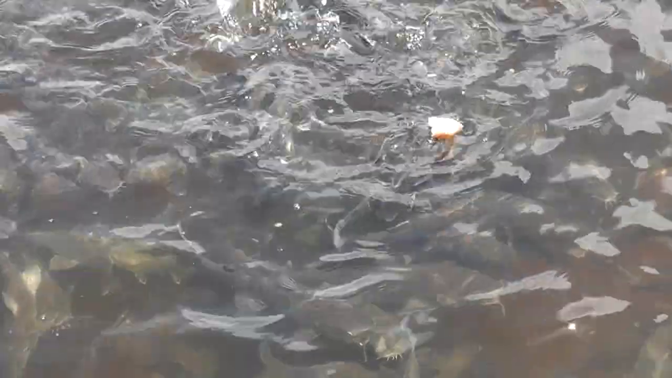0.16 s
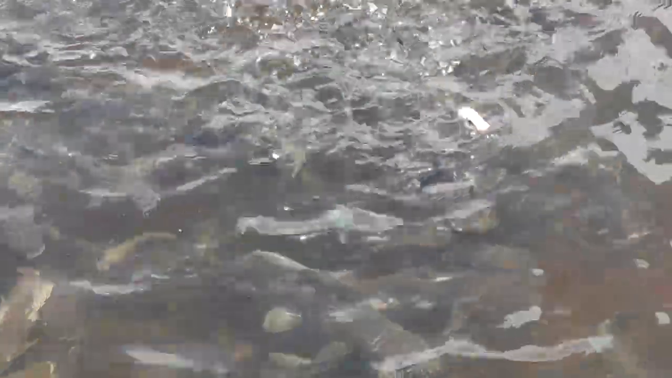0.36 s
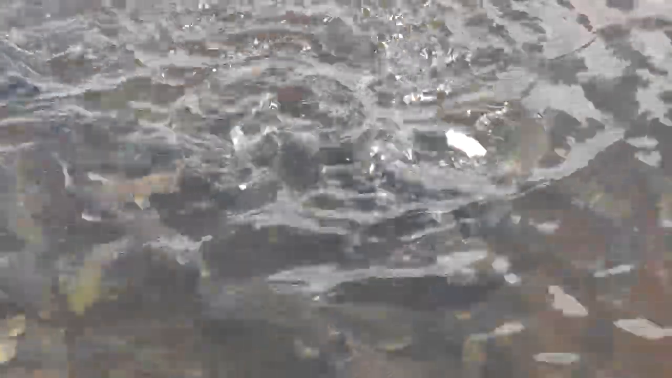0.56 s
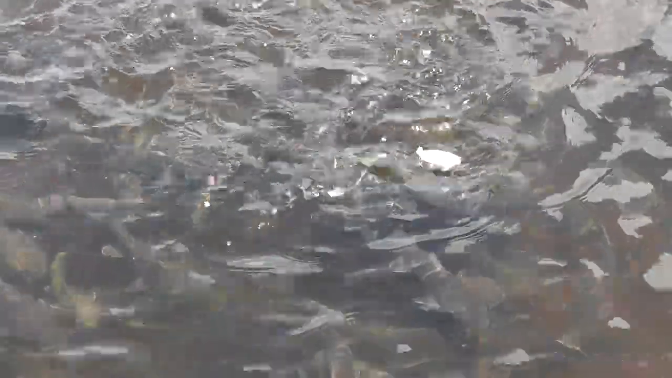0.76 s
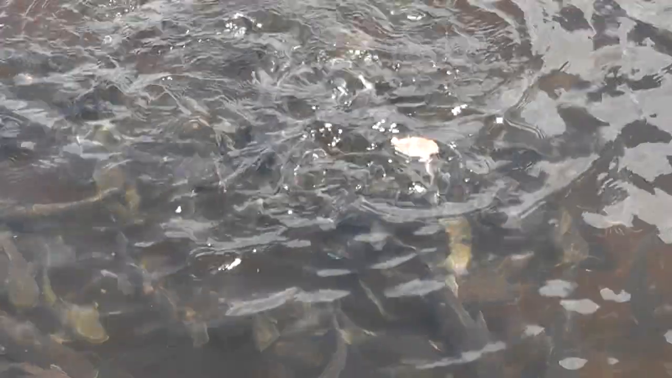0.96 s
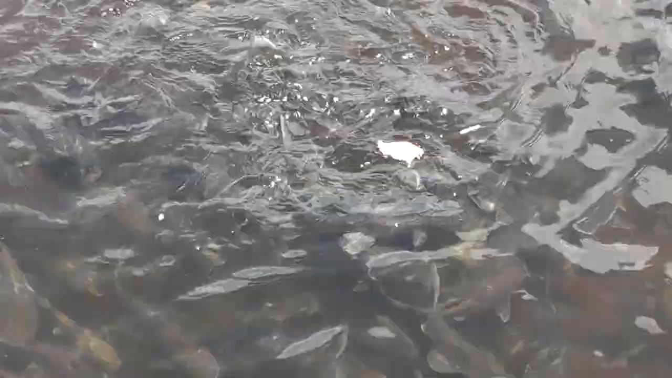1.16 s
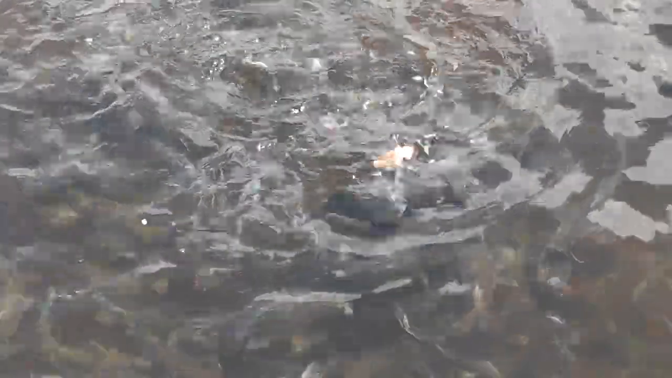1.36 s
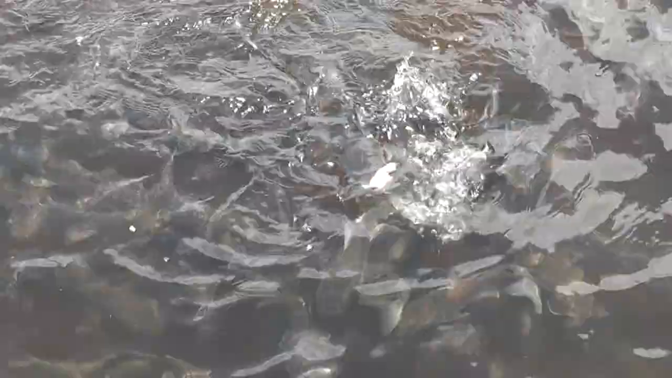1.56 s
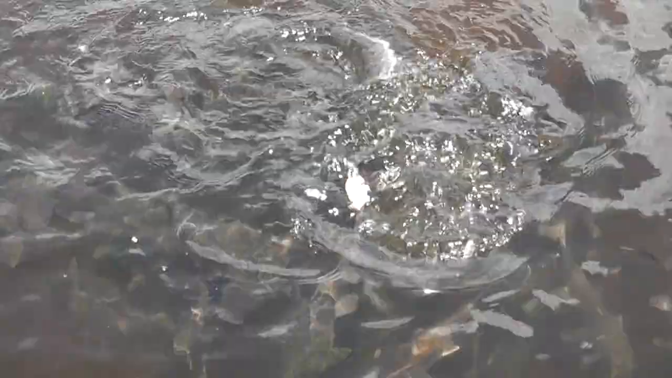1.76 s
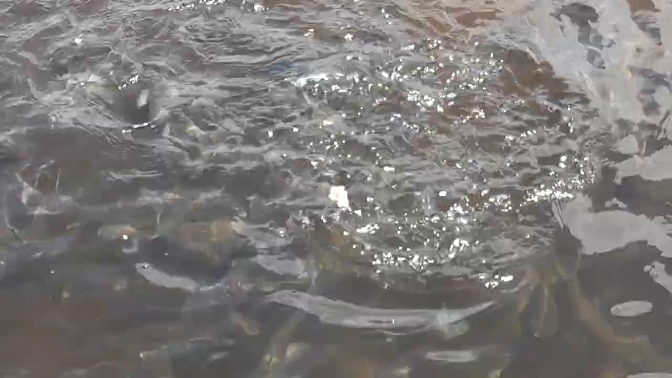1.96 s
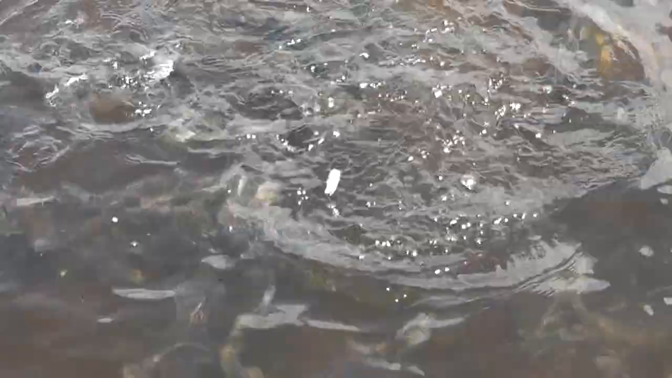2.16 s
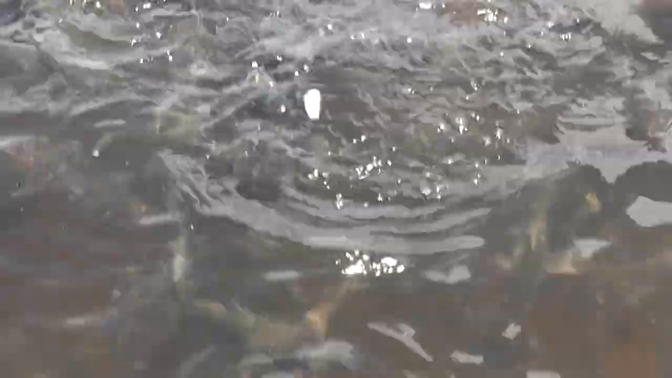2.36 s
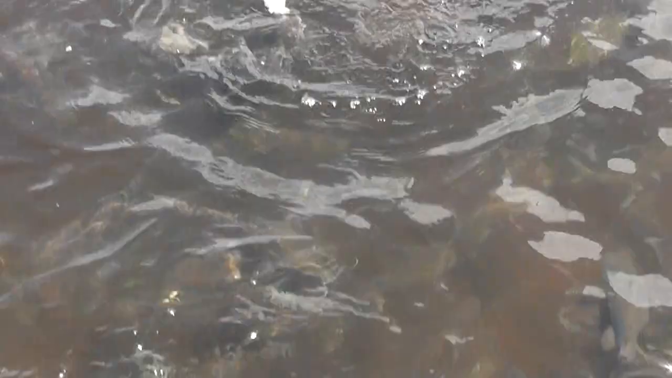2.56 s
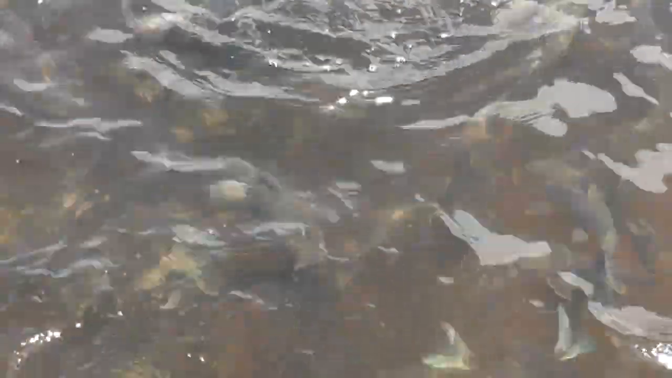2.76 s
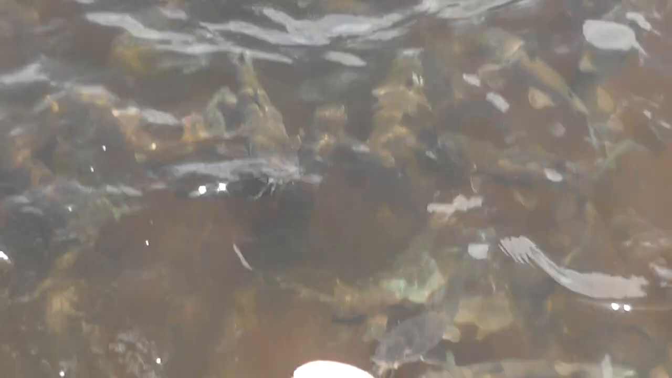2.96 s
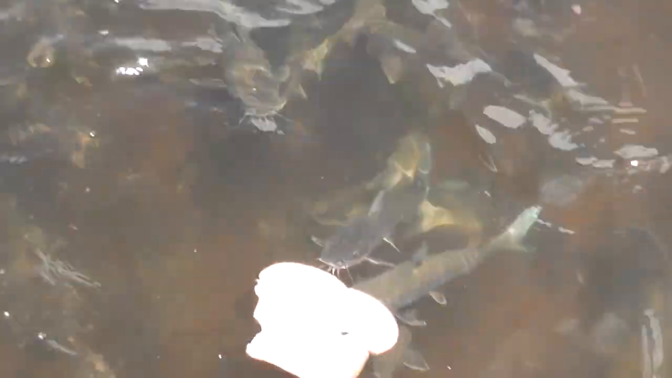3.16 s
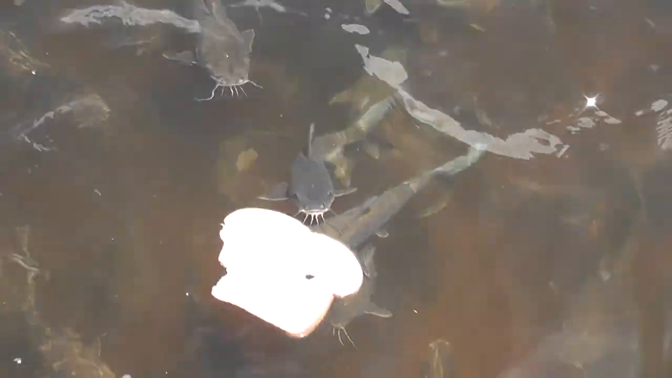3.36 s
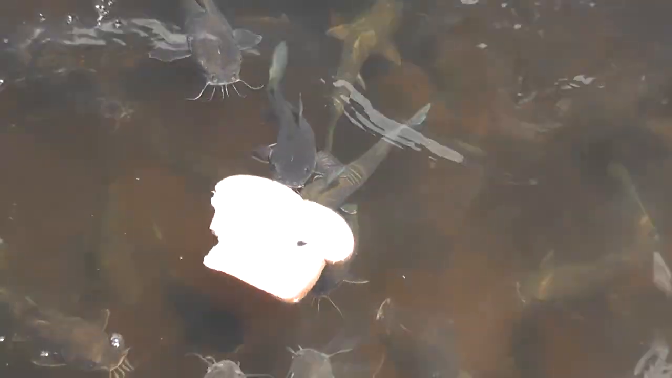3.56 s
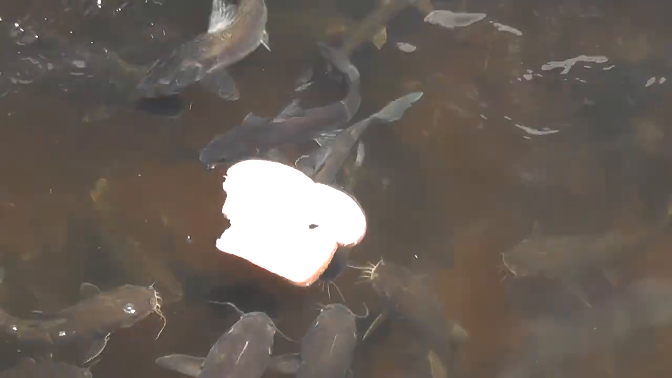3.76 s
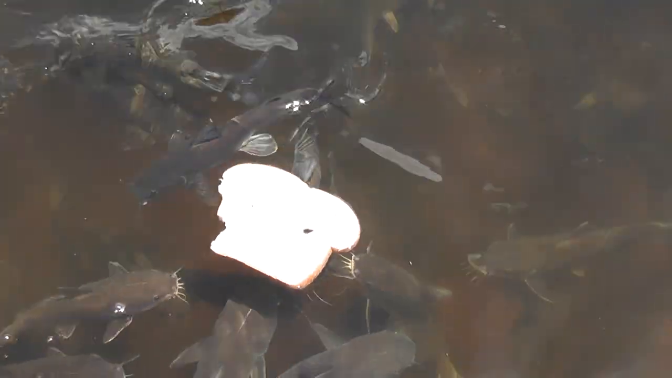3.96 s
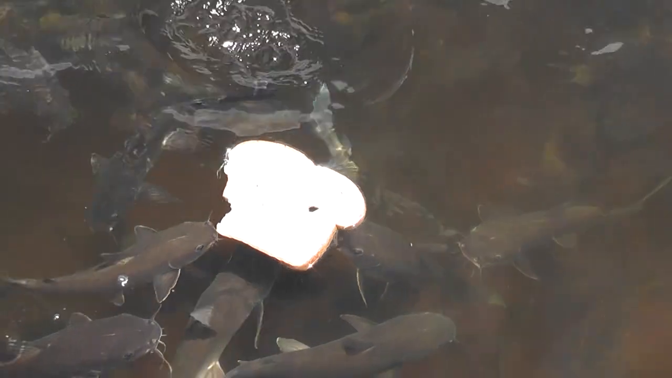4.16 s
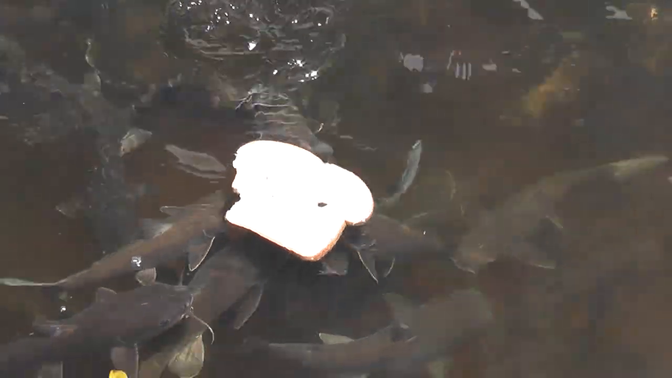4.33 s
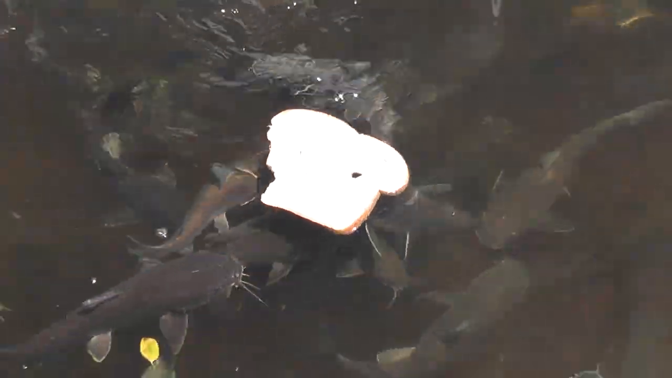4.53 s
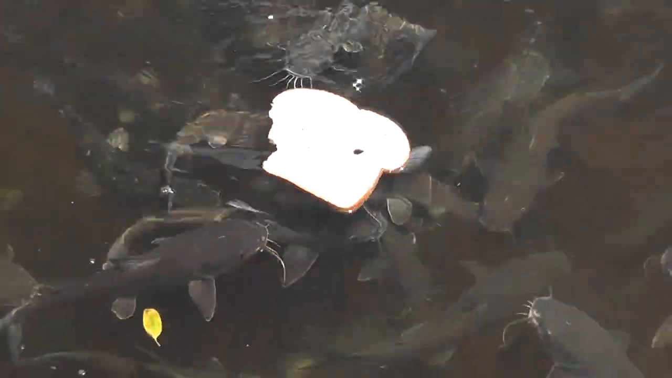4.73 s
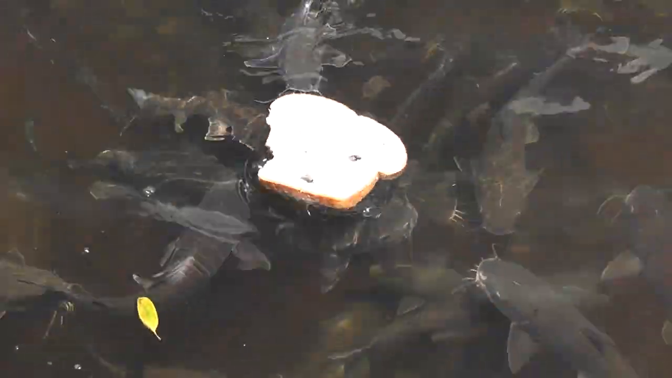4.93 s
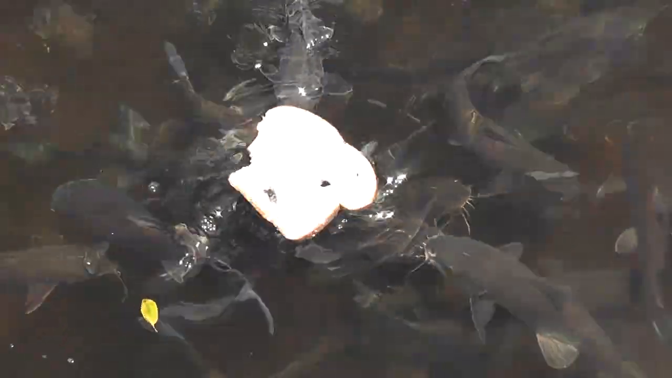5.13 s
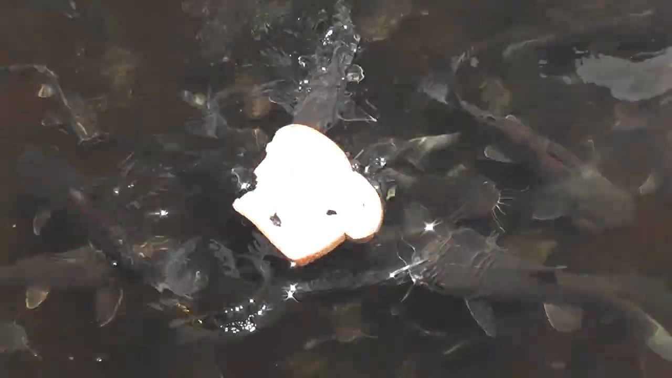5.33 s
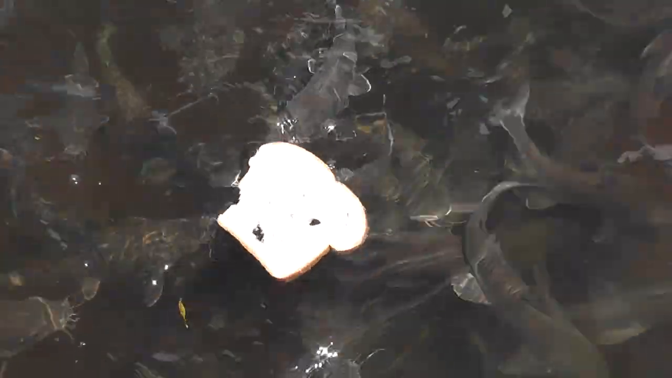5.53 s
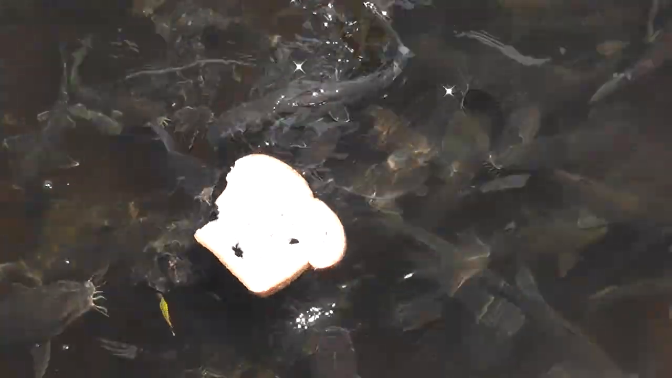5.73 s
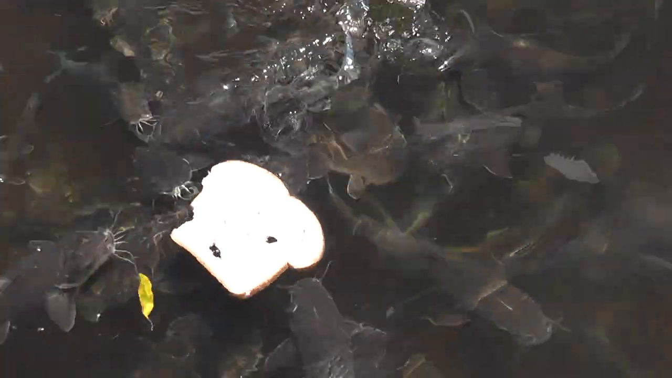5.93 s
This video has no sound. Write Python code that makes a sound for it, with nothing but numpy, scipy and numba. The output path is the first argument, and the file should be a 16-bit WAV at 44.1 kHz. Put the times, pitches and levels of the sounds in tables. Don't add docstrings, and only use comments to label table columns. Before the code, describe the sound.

Outdoor close stereo pickup just over the water. Sparse bubbles and tiny drips open, then tails crack the surface and throw bright droplets, with hollow bubble plops behind them. The water nearly settles under a soft gust, then fish return with irregular smacks, gulps and splashes. A late sharp slap scatters drops, and small gurgles continue to the end over low wind buffeting and faint hiss.

```python
import sys
import numpy as np
from scipy import signal
from scipy.fft import rfft, irfft
from scipy.io import wavfile
from scipy.ndimage import uniform_filter1d
from numba import njit

SR = 44100
rng = np.random.default_rng(int(sys.argv[2]) if len(sys.argv) > 2 else 0)


def dump_mix(stems):
    frames = np.atleast_2d(stems).T
    limited = np.clip(frames, -1, 1)
    pcm = np.round(limited * 32767).astype(np.int16)
    wavfile.write(sys.argv[1], SR, pcm)


def how_loud(loudness_db):
    steps = np.asarray(loudness_db, float) / 20
    return 10 ** steps


N = 268569
TIME = np.arange(N) / SR

# [f/Hz, side minus mid level/dB]
WIDTH = [(200, -7), (700, 5.5), (2400, -6.5), (5000, -25), (9000, -2.5), (15000, 10)]


@njit
def ring(start, hz, octaves, rise, fall, left, right, bend):
    out = np.zeros((2, N))
    for g in range(len(hz)):
        phase = 0.
        span = rise[g] + 2 * fall[g]
        for i in range(min(int(rise[g] + 3.5 * fall[g]), N - start[g])):
            pitch = hz[g] * 2 ** (octaves[g] * min(i / span, 1.3) ** bend)
            phase += 2 * np.pi * min(pitch, .45 * SR) / SR
            age = (i - rise[g]) / fall[g]
            if age < 0:
                size = (i / rise[g]) ** 1.5
            else:
                size = np.exp(-.7 * age) * (1 - (age / 3.5) ** 2)
            out[0, start[g] + i] += left[g] * size * np.sin(phase)
            out[1, start[g] + i] += right[g] * size * np.sin(phase)
    return out


def grains(s, hz, octaves, rise_s, fall_s, db, pan_db):
    # [t/s, left minus right level/dB]
    shoal = [(0.25, 0.5), (1.15, -3), (1.45, 0), (1.9, 0), (2.5, 1.5), (3.1, 0.9), (3.8, -2), (4.3, -1.5),
             (4.92, -1), (5.3, -2.5), (5.9, -1.5)]
    bend = 1.4
    start = np.clip(s * SR, 0, N - 1).astype(np.int64)
    rise = np.maximum(rise_s * SR, 1.)
    fall = np.maximum(fall_s * SR, 1.)
    pan_db = pan_db + np.interp(s, *np.transpose(shoal))
    return ring(start, hz, octaves, rise, fall, how_loud(db + pan_db / 2), how_loud(db - pan_db / 2), bend)


def band(x, lo_hz, hi_hz):
    y = signal.sosfilt(signal.butter(2, [lo_hz, hi_hz], "band", fs=SR, output="sos"), x)
    return y / np.sqrt(np.mean(y ** 2))


def walk(rate):
    k = int(SR / rate)
    return uniform_filter1d(np.repeat(rng.standard_normal(N // k + 1), k), k)[:N]


def colour(x, points):
    hz, db = np.transpose(points)
    size = x.shape[-1]
    log_hz = np.log(np.fft.rfftfreq(size, 1 / SR) + 1)
    gain = how_loud(np.interp(log_hz, np.log(hz), db))
    return irfft(rfft(x) * gain, size)


def rows(table, *rules):
    table = np.array(table, float)
    for column, value in rules:
        table = np.insert(table, int(column), value, axis=1)
    return table


def droplets(s, db, chance, lo_hz, hi_hz, cycles, scatter_db):
    size, life, rarity, place, lateness = np.moveaxis(chance, -1, 0)
    hz = lo_hz * (hi_hz / lo_hz) ** size
    fall = cycles * (0.25 + 1.9 * life ** 2) / hz
    size_db = -scatter_db * np.log(rarity + .05) - 6 * lateness
    energy = np.sum(how_loud(size_db) ** 2 * fall / 3, axis=1, keepdims=True)
    size_db = size_db - 10 * np.log10(energy) + db
    pan_db = 6.5 * (place - .5)
    octaves = .2 * life ** 2
    rise = .6 / hz
    flat = [v.ravel() for v in np.broadcast_arrays(s, hz, octaves, rise, fall, size_db, pan_db)]
    return grains(*flat)


def blows():
    # [t/s, length/ms, level/dB, treble minus middle level/dB]
    tail_slaps = [(0.017, 21.3, -53.5, 4), (0.979, 13, -39.5, -12.5), (1.362, 19.6, -31.5, -6),
                  (1.363, 20.7, -27, 10), (1.521, 18, -38.5, -13), (1.926, 19, -46.5, 13),
                  (1.96, 32, -49.5, 16), (1.992, 7.7, -49, -5.5), (2.1, 17.4, -51.5, 18),
                  (2.476, 22.3, -53, -3), (3.111, 10, -33, 0.5), (3.21, 10.6, -51, -6), (3.866, 8, -53, -1),
                  (4.134, 19.5, -38.5, -1), (4.878, 11, -51, 20), (4.9102, 16, -30.5, 19),
                  (5.002, 8.7, -40, -4), (5.184, 12.6, -45, -6), (5.196, 13.2, -39, -16),
                  (5.38, 23.7, -44.5, -11), (5.685, 30.3, -48, -17), (5.825, 14.2, -37, -4)]
    # [t/s, level/dB, treble minus middle level/dB]
    ticks = [(0.025, -40, -27), (0.501, -46.5, 3), (0.766, -48.5, 34), (0.841, -47, 30), (0.971, -42, 22),
             (1.154, -37, -4), (1.538, -33, -7), (1.941, -48, 15), (2.067, -45, 27), (2.379, -46.5, 34),
             (2.885, -34, 3), (4.012, -47, 23), (5.132, -40, 17), (5.699, -33, -21), (5.996, -42.5, -7)]
    # [t/s, level/dB, treble minus middle level/dB]
    smacks = [(0.089, -58, 0), (0.254, -41, -13.5), (0.313, -40, -14), (0.382, -50.5, 16), (0.635, -62, 38),
              (1.078, -34.5, -9), (1.2, -35.5, -10), (1.5, -42, -1), (1.783, -46.5, 10), (3.007, -44, 4),
              (3.25, -42, -5), (3.483, -44, 18), (3.571, -53, 19), (3.682, -30.5, -8), (3.799, -32.5, -26),
              (4.045, -44, -10), (4.209, -33, 0.5), (4.337, -24, -4.5), (5.094, -41, -2), (5.674, -45, -10),
              (6.014, -40.5, -22), (6.083, -45, -12)]
    # [t/s, length/ms, level/dB]
    sloshes = [(0.176, 24.5, -51.5), (1.125, 18.6, -42), (1.253, 24.7, -40.5), (1.289, 22, -34),
               (1.466, 15, -49), (1.866, 6.9, -56), (3.279, 28, -41), (3.714, 17.6, -41.5),
               (3.932, 15, -41.5), (5.443, 13.4, -44.5), (5.936, 12.5, -42), (6.061, 19.6, -39)]
    length, treble = 1, 3
    every = np.vstack([
        rows(ticks, (length, 1.1)),
        rows(smacks, (length, 4.3)),
        rows(sloshes, (treble, -18)),
        tail_slaps])
    return every[np.argsort(every[:, 0], kind="stable")]


def slaps():
    s, ms, db, treble_db = blows().T[..., None]
    length = np.maximum(ms, 1) / 1000
    middle_db = db - 10 * np.log10(1 + how_loud(treble_db) ** 2) + 10 * np.log10(length)
    sizes = [(425, 1600, 4.7, 10, 0.13, -3.5),
             (1051, 4650, 2.0, 50, 0.22, 2.0),
             (4300, 16200, 1.96, 140, 1, 1.5)]
    out = 0
    for lo_hz, hi_hz, cycles, drops, tilt, trim_db in sizes:
        chance = rng.uniform(size=(len(s), drops, 5))
        when = s + 1.2 * length * chance[..., 4] ** 1.15
        level_db = middle_db + tilt * treble_db + trim_db
        out = out + droplets(when, level_db, chance, lo_hz, hi_hz, cycles, 4.5)
    return out


def agitation():
    # [t/s at full strength, hold/s, gurgle level/dB, spray minus gurgle level/dB]
    bouts = [(0, 0.012, -54.5, -19), (0.238, 0.17, -55.5, -9), (1.11, 0.44, -46.5, -14.5),
             (1.446, 0.078, -44, -11), (1.57, 0.21, -47, -10.5), (1.784, 0.21, -41.5, -9.5),
             (2.087, 0.017, -47.5, -12), (2.213, 0.27, -68, 2), (2.52, 0.81, -61, -9),
             (3.282, 0.12, -48, -10.5), (3.414, 0.099, -56, -2.5), (3.48, 0.59, -53.5, -4.5),
             (3.807, 0.11, -42.5, -14), (4.02, 0.39, -57, -13), (4.925, 0.021, -44, -15.5),
             (5.058, 0.19, -53.5, -6.5), (5.429, 0.085, -51.5, -12.5), (5.6, 0.57, -61, -25),
             (5.878, 0.21, -57, -14)]
    build_db_s, settle_db_s = 323, 110
    s, hold, gurgle_db, spray_db = np.transpose(bouts)[..., None]
    t = TIME[::64]
    before = np.maximum(s - t, 0)
    after = np.maximum(t - s - hold, 0)
    shape_db = gurgle_db - build_db_s * before - settle_db_s * after

    def total_db(db, calm_db):
        return 10 * np.log10(np.sum(how_loud(db) ** 2, axis=0) + how_loud(calm_db) ** 2)

    return t, total_db(shape_db, -69), total_db(shape_db + spray_db, -74)


def churn():
    s, gurgle_db, spray_db = agitation()
    kinds = [(gurgle_db / 2, 230, 600, 3.0, 500, 2, -62),
             (gurgle_db, 500, 1600, 5.5, 1300, 2, -36),
             (gurgle_db, 1300, 5000, 6.5, 2500, 2, -33),
             (spray_db, 4000, 15500, 4.5, 2200, 5, -29),
             (gurgle_db, 750, 2600, 9, 450, 1, -27)]
    out = 0
    for db, lo_hz, hi_hz, cycles, handfuls, drops, trim_db in kinds:
        chance = rng.uniform(size=(handfuls, drops, 5))
        size, place, rarity = rng.uniform(size=(3, handfuls, 1))
        chance[..., 0] = (chance[..., 0] + size) / 2 * 1.4 - .2
        when = place * N / SR + 0.0049 * chance[..., 4] ** 2
        loud_db = np.interp(when, s, db) - 2.6 * np.log(rarity + .03)
        out = out + droplets(when, loud_db + trim_db, chance, lo_hz, hi_hz, cycles, 6.4)
    flicker_db = 2.5 * walk(60)
    fizz_db = np.interp(TIME, s, spray_db) - 13.0 + flicker_db
    return out + how_loud(fizz_db) * band(rng.standard_normal(N), 800, 13000)


def bubbles():
    # [t/s, f/Hz, peak level/dB]
    plops = [(0.192, 508, -39), (0.253, 1285, -36), (0.383, 2890, -43), (0.525, 1070, -47.5),
             (1.081, 733, -32.5), (1.175, 880, -37.5), (1.189, 824, -42), (0.977, 990, -37.5),
             (1.53, 2300, -43), (1.992, 2970, -33.5), (4.042, 1590, -40.5), (4.335, 1130, -35),
             (5.0, 1420, -42), (5.137, 560, -47.5), (5.825, 1600, -39), (5.937, 2250, -39.5),
             (5.941, 1350, -41.5), (0.09, 2000, -50), (0.104, 2200, -53), (0.517, 1780, -52),
             (1.066, 2050, -52), (1.425, 1240, -41), (1.645, 1390, -34), (1.4655, 1650, -32.5),
             (1.778, 826, -21), (1.78, 540, -23), (1.788, 600, -27.5), (1.824, 960, -31.5),
             (1.868, 1880, -39.5), (1.94, 635, -39.5), (2.075, 980, -42.5), (2.377, 1190, -57.5),
             (2.413, 1270, -46.5), (2.481, 2590, -44), (3.483, 1660, -38), (3.009, 640, -46),
             (3.699, 840, -35), (3.292, 1460, -38), (3.871, 2110, -40), (4.242, 1920, -46.5),
             (5.396, 1370, -50), (5.674, 577, -36.5), (6.042, 640, -48), (6.054, 880, -37.5)]
    # [t/s, length/ms, f/Hz, peak level/dB]
    gulps = [(.088, 49, 777, -64), (0.315, 20, 734, -43), (0.732, 15, 1320, -57), (.78, 20, 1120, -55.5),
             (1.141, 5.8, 335, -41), (1.333, 18, 614, -37.5), (1.808, 30, 852, -35), (1.942, 61, 557, -54),
             (1.958, 23, 655, -44), (1.964, 22, 770, -40), (1.995, 42, 724, -44), (2.596, 6.3, 375, -47.5),
             (2.868, 18, 660, -48), (3.434, 14, 640, -47), (3.618, 11, 1320, -49), (3.325, 29, 1386, -51),
             (3.868, 30, 724, -27), (3.894, 10, 700, -43), (3.909, 7, 745, -29), (3.922, 16, 700, -40),
             (3.637, 40, 713, -40), (1.592, 37, 683, -46), (5.098, 4.8, 648, -36.5), (5.38, 10, 650, -44),
             (5.382, 37, 780, -51), (5.428, 21, 637, -49), (5.829, 18, 572, -44), (5.944, 13, 735, -35.5),
             (6.042, 18, 680, -42.5)]
    # [t/s, length/ms, start f/Hz, peak level/dB]
    hollows = [
        (1.501, 15, 702, -35),
        (1.545, 33, 340, -44.5),
        (1.802, 32, 620, -42),
        (3.111, 7.8, 711, -38),
    ]
    # [t/s, length/ms, start f/Hz, glide/octaves, peak level/dB]
    gurgles = [(0.232, 48, 494, 1.66, -49), (0.255, 52, 643, .2, -57), (0.53, 40, 1050, 0.45, -63),
               (2.157, 12, 1780, .15, -53), (2.176, 45, 900, .4, -53), (3.575, 16, 1400, .5, -51),
               (1.239, 78, 303.4, 1.46, -45.5), (1.582, 76, 238.5, 1.7, -46.5),
               (1.183, 43, 475, 1.9, -45.5), (1.466, 4.7, 2180, -0.87, -35),
               (1.471, 19.4, 1200, -0.79, -34.5), (1.744, 29, 1250, 0.4, -49),
               (1.884, 58, 495, -0.051, -49), (2.2, 12, 2210, -0.069, -55), (2.532, 20, 1460, 0.5, -61),
               (2.668, 22, 910, 1.35, -53.5), (2.087, 56, 560, 1, -52), (3.422, 63, 466, -0.7, -60),
               (3.839, 12.5, 730, 0.11, -37), (3.985, 50, 1003, 0.68, -49), (4.27, 63, 794, 0.69, -60),
               (4.452, 45, 598, 1.1, -54.5), (4.842, 42, 344, 0.41, -54.5), (4.912, 14, 585, 0.45, -26),
               (4.99, 23, 333, 0.23, -45), (5.028, 28, 562, 0.6, -48), (5.512, 24, 914, 0.7, -57),
               (5.405, 28, 1150, 0.97, -50.5), (5.889, 28, 365, 0.5, -50), (6.066, 30, 780, 0.11, -42.5)]
    # [t/s, length/ms, start f/Hz, glide/octaves, peak level/dB]
    risers = [(0.144, 59, 348, 0.31, -48), (0.176, 66, 376, 1.4, -47.5), (1.154, 27, 182, 1.1, -34.5),
              (1.369, 12, 382, -0.71, -30), (1.812, 58, 331, 0.5, -36), (2.168, 12, 877, 0.19, -57),
              (3.261, 11, 705, 0.29, -46), (0.03, 12, 1320, 0.02, -52), (3.279, 4.1, 1078, 0.24, -40),
              (3.7, 27.3, 954, 0.8, -37), (4.392, 26, 896, 0.94, -51.5), (4.392, 36, 330, 1.3, -44),
              (4.902, 5.7, 673, 0.73, -33.5), (5.335, 40, 443, 1.06, -51), (5.919, 18.4, 504, 0.79, -43.5),
              (5.955, 23, 1020, 0.92, -50)]
    length, glide, swelling = 1, 3, 5
    s, ms, hz, octaves, db, swell = np.vstack([
        rows(plops, (length, 2.87), (glide, 0.12), (swelling, 0.092)),
        rows(gulps, (glide, 0.12), (swelling, 0.099)),
        rows(hollows, (glide, -0.48), (swelling, 0.15)),
        rows(gurgles, (swelling, 0.029)),
        rows(risers, (swelling, 0.81))]).T
    swell = np.clip(swell, .03, .95)
    rise = swell * ms / 1000 + .5 / hz
    fall = .5 * (1 - swell) * ms / 1000 + 0.0015
    waver = how_loud(2 * walk(160))
    return waver * grains(s, hz, octaves, rise, fall, db + 5.5, 0)


def drips():
    # [t/s, f/Hz, peak level/dB]
    lone_drops = [(0.027, 1590, -38.5), (0.182, 1050, -43.5), (0.82, 2920, -50.5), (0.941, 2130, -49),
                  (1.08, 2270, -46), (1.116, 2140, -38.5), (1.152, 4030, -30.5), (1.252, 3100, -30.5),
                  (1.26, 1210, -34), (1.26, 3220, -36), (1.332, 2800, -42), (1.373, 4300, -42),
                  (1.48, 3470, -37), (1.502, 1510, -31), (1.738, 3920, -39.5), (1.81, 994, -33),
                  (1.861, 4220, -45), (1.881, 3070, -35), (1.924, 2210, -27), (1.966, 4360, -31),
                  (1.976, 1680, -35), (2.053, 3190, -36), (2.076, 2000, -38), (2.238, 2720, -43.5),
                  (2.454, 3100, -43.5), (2.884, 1520, -43.5), (3.117, 2140, -31.5), (3.286, 3700, -38),
                  (3.484, 3230, -34), (3.572, 4080, -40), (3.611, 3170, -38), (3.683, 4400, -51),
                  (3.719, 3500, -34), (3.76, 1420, -37), (3.799, 2680, -25.5), (3.932, 1100, -35),
                  (3.936, 3670, -28), (4.013, 3640, -35.5), (4.083, 1760, -38.5), (4.093, 4390, -42),
                  (4.207, 1450, -48), (4.2095, 4300, -23), (4.359, 2340, -40.5), (4.878, 3720, -38.5),
                  (4.912, 2230, -28), (4.927, 3600, -30), (5.073, 3700, -37.5), (5.093, 1030, -48),
                  (5.198, 1240, -40), (5.252, 2500, -42.5), (5.293, 2500, -42), (5.455, 3400, -35.5),
                  (5.713, 4170, -41.5), (5.899, 3600, -44), (5.996, 3700, -31.5), (6.017, 2060, -35.5)]
    # [t/s, f/Hz, peak level/dB]
    specks = [(0.017, 6740, -35.5), (0.026, 8600, -40), (0.232, 7000, -46), (0.264, 10160, -48),
              (0.413, 4630, -45), (0.502, 5680, -45), (0.636, 10100, -38), (0.767, 6570, -40),
              (0.99, 8300, -39), (1.152, 4570, -38), (1.203, 6720, -34.5), (1.203, 12920, -44),
              (1.366, 7230, -13), (1.387, 6840, -25), (1.523, 7850, -31), (1.54, 7750, -23.5),
              (1.703, 5680, -45), (1.788, 9910, -40), (1.873, 6560, -29), (1.935, 5770, -30.5),
              (1.966, 4640, -32), (1.996, 6720, -26), (2.066, 7700, -31), (2.448, 8100, -40),
              (2.466, 9470, -46), (3.094, 9730, -45), (3.115, 6740, -25.5), (3.213, 8900, -41),
              (3.412, 9990, -35), (3.531, 9390, -40), (3.683, 4980, -38), (3.719, 11100, -36),
              (3.862, 5060, -33.5), (4.012, 9800, -32), (4.147, 9650, -29), (4.158, 9820, -31),
              (4.2123, 10200, -22.5), (4.878, 5230, -35), (4.926, 6500, -26), (5.002, 12400, -31),
              (5.094, 9990, -33), (5.121, 6630, -43), (5.131, 10250, -35), (5.189, 4560, -35),
              (5.375, 9960, -49), (5.396, 4910, -34.5), (5.826, 9540, -24.5), (5.84, 11200, -36),
              (5.887, 6000, -43), (5.898, 10160, -43), (5.942, 6100, -36), (6.014, 9200, -36.5),
              (6.065, 10300, -36)]
    out = 0
    for table, cycles in [(lone_drops, 4.1), (specks, 5.1)]:
        s, hz, db = np.transpose(table)
        out = out + grains(s, hz, 0.048 + 0 * s, 1.3 / hz, cycles / hz, db + 0.5, 0)
    return out


def snaps():
    # [t/s, peak level/dB]
    cracks = [(0.9709, -36), (1.1534, -33), (1.3624, -16), (1.3675, -19), (1.3687, -19), (1.3706, -19),
              (1.9262, -32), (1.9938, -26), (3.0069, -29), (3.1106, -16), (3.1152, -21), (3.119, -33),
              (3.1227, -35), (3.1287, -42), (3.799, -27), (4.0125, -30), (4.1295, -39), (4.1328, -35),
              (4.1341, -28), (4.1558, -33), (4.9125, -15), (4.9161, -15), (4.92, -13), (5.095, -31)]
    s, db = np.transpose(cracks)
    same = np.ones(len(s))
    out = 0
    for hz, trim_db in [(4370, -5.5), (10300, 0)]:
        out = out + grains(s, hz * same, 0 * s, .5 / hz * same, 1.34 / hz * same, db + trim_db, 0)
    return out


def babble(count=640):
    s, gurgle_db, spray_db = agitation()
    when, size, life, loud, side = rng.uniform(size=(count, 5)).T
    when = when * N / SR
    hz = 450 * 5.5 ** size
    db = np.interp(when, s, gurgle_db) - 4 - 4 * size - 3 * np.log(loud + 0.019)
    fall = (4.3 + 8 * life ** 2) / hz
    chirps = grains(when, hz, 0.87 * (life - .15), 2 / hz, fall, db, 5 * (side - .5))

    when, size, loud = rng.uniform(size=(2 * count, 3)).T
    when = when * N / SR
    hz = 5000 * 3.3 ** size
    db = np.interp(when, s, spray_db) - 7.4 * np.log(loud + 0.024)
    clicks = grains(when, hz, 0 * hz, .4 / hz, 1.7 / hz, db, 0)
    return chirps + clicks


def wash():
    s, gurgle_db, _ = agitation()
    hiss_db = np.interp(TIME, s, gurgle_db) - 20 + 3.4 * walk(70)
    hiss = how_loud(hiss_db) * band(rng.standard_normal(N), 500, 6100)
    mid, side = (how_loud(-84 + 4.5 * walk(10)) * band(rng.standard_normal(N), 28, 83) for _ in range(2))
    return hiss + np.array([mid + 2.0 * side, mid - 3.5 * side])


def dock(x):
    age = np.arange(SR // 10) / SR
    decay = how_loud(-60 * age / .035) * (age > .001)
    tail = rng.standard_normal((2, len(age))) * decay
    mid, side = signal.fftconvolve(x.mean(axis=0, keepdims=True), tail, axes=1)[:, :N]
    side = how_loud(-35.5) * colour(side, WIDTH)
    return x + how_loud(-37.0) * mid + np.array([side, -side])


def puffs():
    # [t/s, peak level/dB]
    thuds = [(2.301, -50), (2.322, -42.5), (2.345, -54), (1.4, -59), (1.925, -56), (1.365, -44), (5, -50),
             (2.377, -56), (2.454, -49), (2.495, -44.5), (4.783, -37), (8.3, -46), (5.404, -48),
             (5.611, -46.5), (9.1, -47)]
    s, db = np.transpose(thuds)
    same = np.ones(len(s))
    return grains(s, 105 * same, 0.045 * same, 0.0071 * same, 0.0066 * same, db, 1.3)


def wind():
    # [t/s, level/dB]
    gusts = [
        (0, -48),
        (.2, -67),
        (2.2, -59.5),
        (2.35, -54),
        (2.7, -58.5),
        (4.6, -61.5),
        (5.0, -53.5),
        (6.09, -54),
    ]
    mid, side = (how_loud(0.3 * walk(22.0)) * band(rng.standard_normal(N), 59, 131) for _ in range(2))
    strength = how_loud(np.interp(TIME, *np.transpose(gusts)) - 10.0)
    return strength * np.array([mid + 1.87 * side, mid - 2.0 * side])


def air():
    # [f/Hz, level per Hz/dB]
    spectrum = [(100, -6.5), (170, 1.5), (330, 2.5), (450, -14), (800, -21.5), (1600, -20), (2700, -28.5),
                (9000, -40), (16000, -33)]
    mid, side = colour(rng.standard_normal((2, N)), spectrum)
    side = colour(side, WIDTH)
    return how_loud(-64 + 0.3 * walk(6.8)) * np.array([mid + side, mid - side]) / np.std(mid)


def scene():
    # [f/Hz, level/dB]
    response = [(500, -1), (2000, -5), (2600, -4), (4000, -1), (5700, -4.5), (7000, -2.5), (10500, 3.5),
                (13000, 0.5), (15700, -5.5), (16300, -38.5)]
    water = snaps() + drips() + bubbles() + colour(slaps() + churn(), response)
    high_pass = signal.butter(2, 170, "high", fs=SR, output="sos")
    water = dock(signal.sosfilt(high_pass, water))
    return water + air() + wind() + puffs() + wash() + babble()


def band_limit(x):
    return signal.sosfilt(signal.butter(12, 16830, fs=SR, output="sos"), x)


def record(dry):
    return band_limit(dry)


dry = scene()
out = record(dry)
dump_mix(out)
```